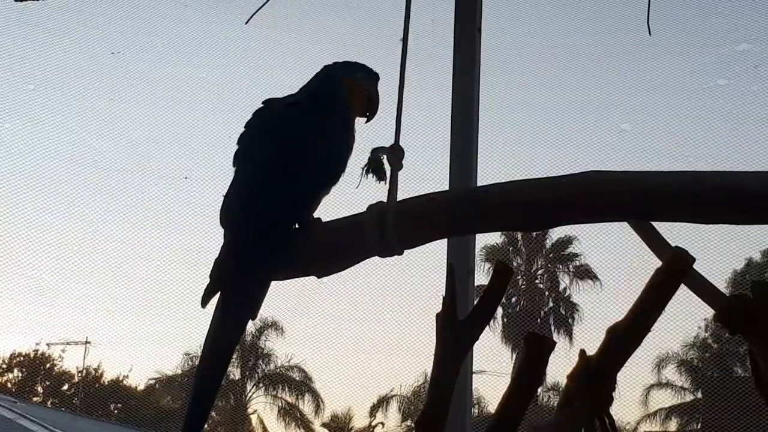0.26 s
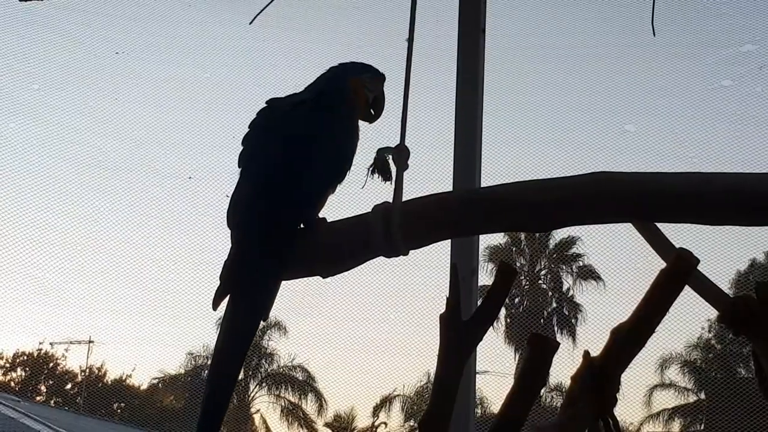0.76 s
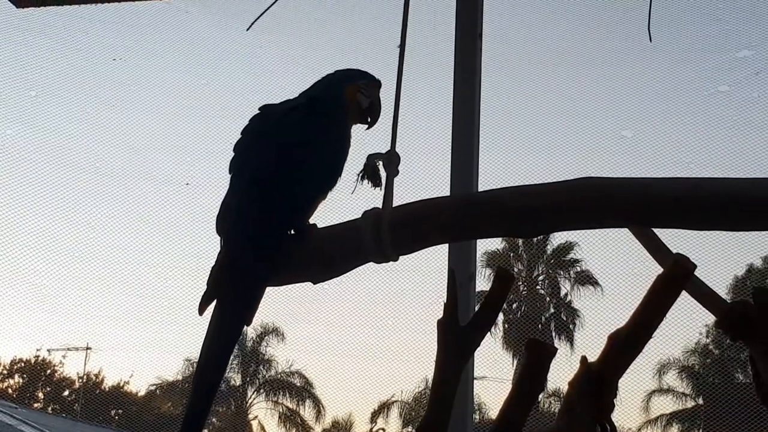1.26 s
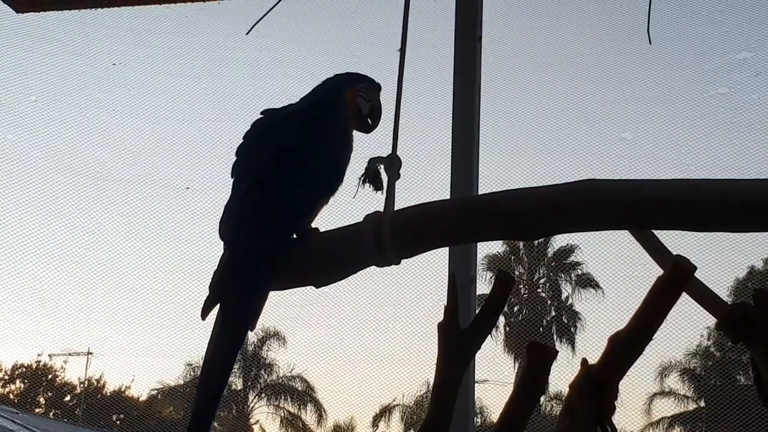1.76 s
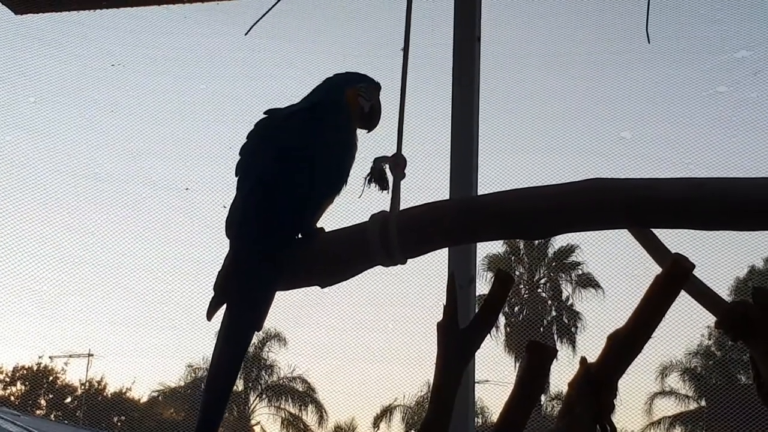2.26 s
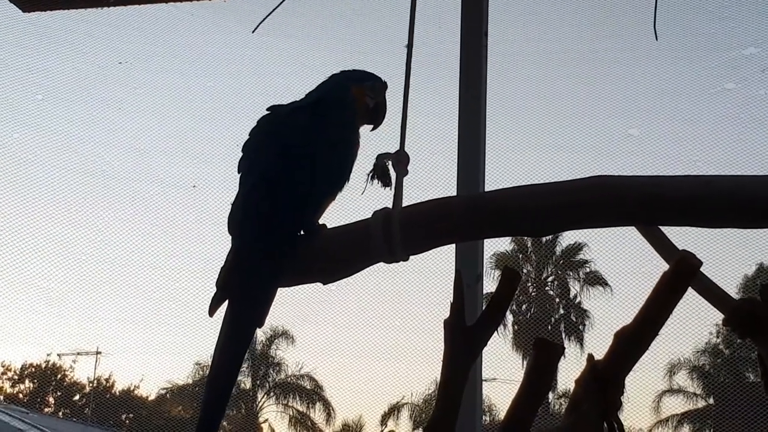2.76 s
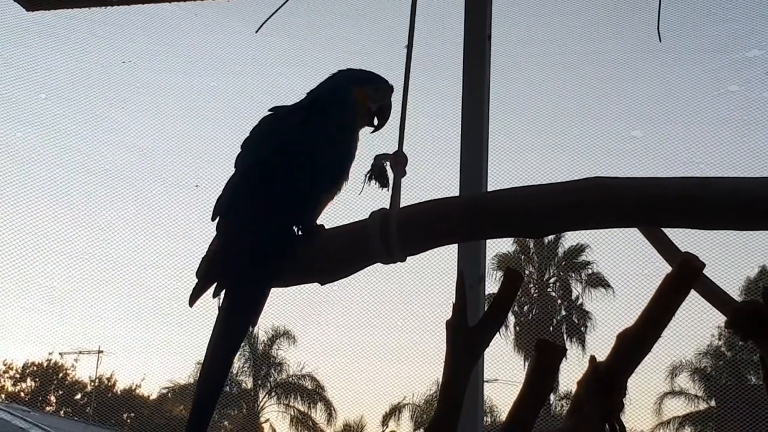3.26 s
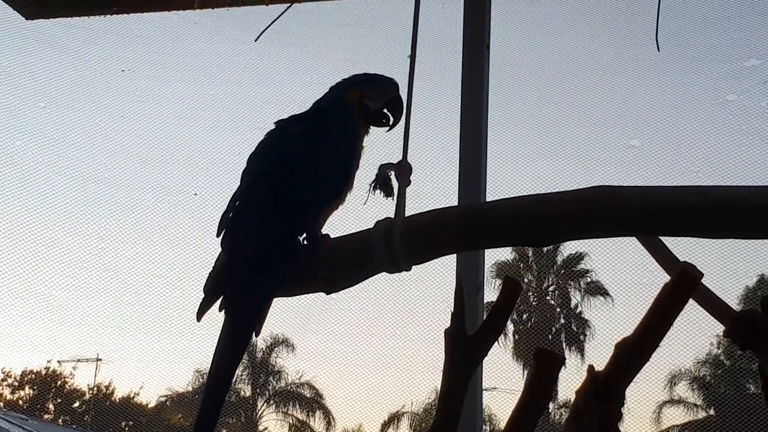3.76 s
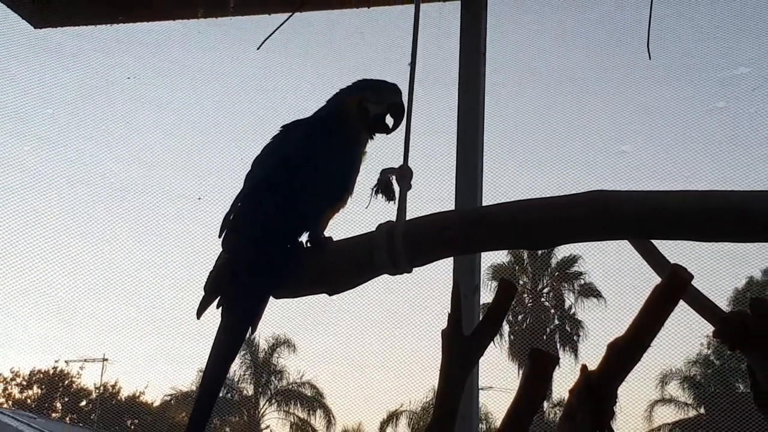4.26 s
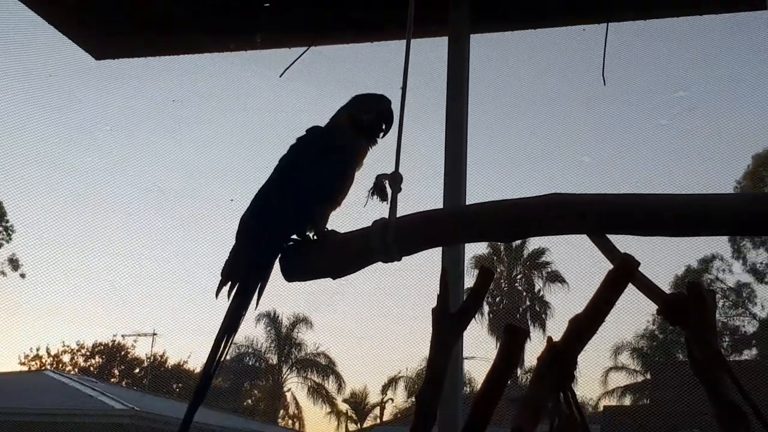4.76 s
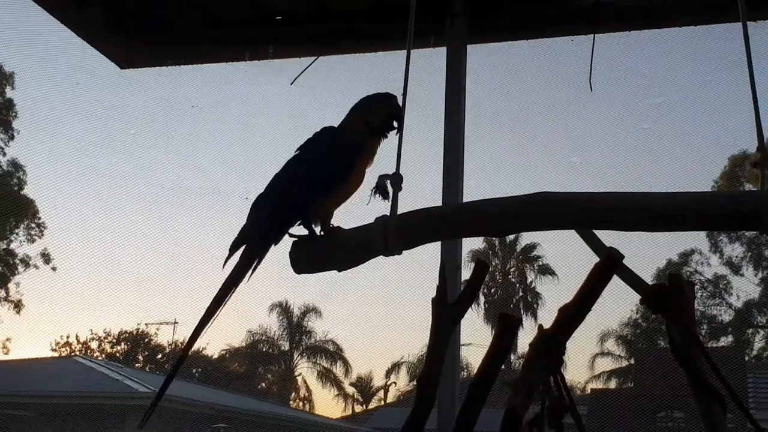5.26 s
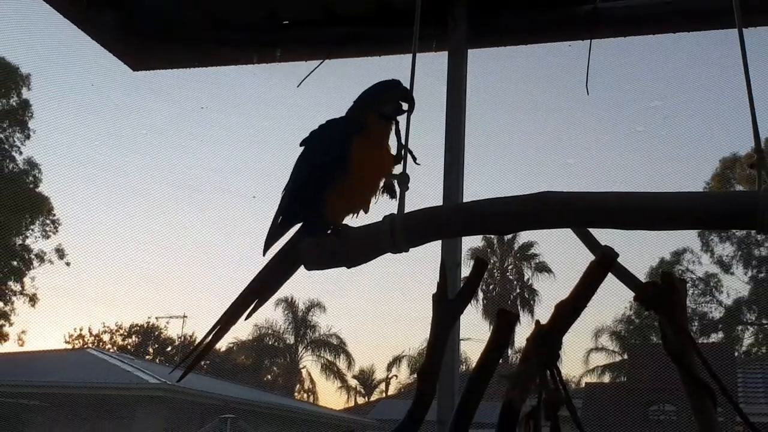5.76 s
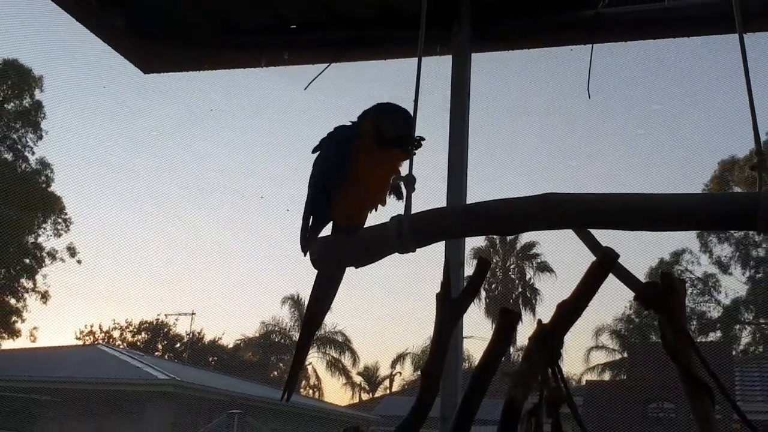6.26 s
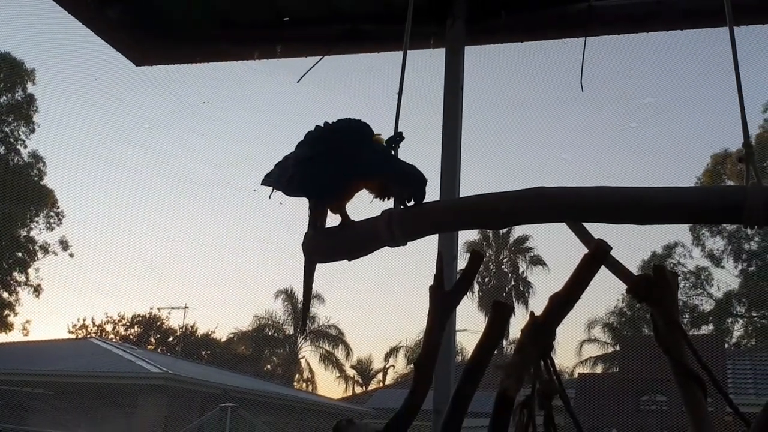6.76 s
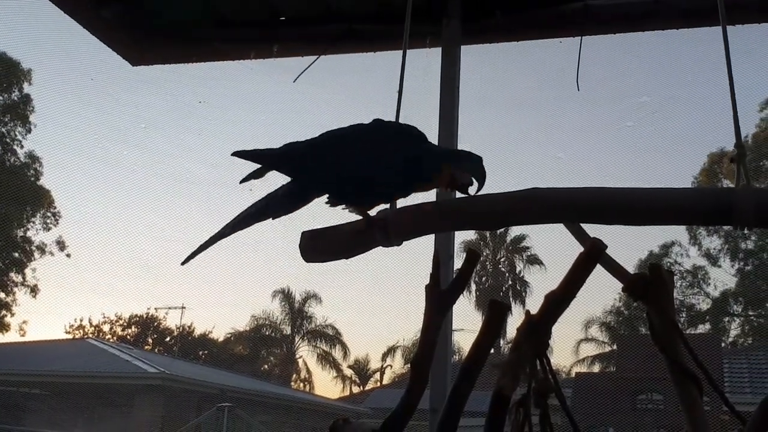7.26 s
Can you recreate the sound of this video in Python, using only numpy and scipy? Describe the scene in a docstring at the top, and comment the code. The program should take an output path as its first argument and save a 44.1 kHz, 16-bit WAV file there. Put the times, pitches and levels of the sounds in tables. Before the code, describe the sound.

Quiet outdoor aviary in stereo: low, steady town rumble and the hazy blur of a far flock. From 0 to 0.4 s distant parrots chirp busily with a faint rasp, and another rasp comes at 0.43 s. At about 0.6 s a close parrot gives a loud squawk, opening with a pop, sagging in pitch and breaking hoarse by 0.9 s; a thin two-voiced whistle overlaps it from 0.76 to 1.03 s. Sparse far chirps, twitter and short rasps continue from 1 to 4 s. At 4.2 s a near whistle climbs for half a second, meeting two harsh, loud squawks at 4.5 and 4.7 s, which bounce off roof, walls and beams and die quickly. Distant rasps and chirps return around 5.2-5.4 s. A small sharp claw click falls at 5.8 s, then soft feathery shuffles on the perch at 6.6-7.1 s, with faint twitter to the end at 7.5 s.

```python
"""Parrots in an outdoor aviary in the early morning, heard by two microphones.
Distant birds chirp and rasp from the start, over a low town rumble and the blur of a far flock.
A near parrot gives a falling squawk with a two-voiced whistle; later another whistle leads into two
harsh squawks. Roof, walls and close beams throw these back. Then a macaw shuffles and clicks on its perch.
Voices are summed harmonics and sines; rasps, shuffles and background are shaped noise."""
import sys
import numpy as np
from scipy import signal
from scipy.fft import rfft, irfft
from scipy.io import wavfile
from scipy.ndimage import uniform_filter1d

SR = 44100
rng = np.random.default_rng(int(sys.argv[2]) if len(sys.argv) > 2 else 0)


def store_pcm(level_fs):
    """Save levels as 16-bit WAV."""
    pcm = np.round(np.clip(level_fs, -1, 1) * 32767).astype(np.int16)
    wavfile.write(sys.argv[1], SR, np.atleast_2d(pcm).T)


N = 331632
TIME = np.arange(N) / SR  # seconds
EDGE_HZ = 15750  # upper limit of the voices' harmonics and of the recorder

# colour of the far flock, also used for the air in the whistles: hz, level_db
FLOCK_SPECTRUM = [(700, -15), (1400, 0.5), (2500, 0), (4200, -1), (6000, -7), (7600, -10), (8600, -24.5),
                  (10500, -20.5), (15500, -24.5)]
# bouts of the far flock: middle_s, half_length_s, note_count, note_level_db, blur_level_db (before the mix)
FLOCK_BOUTS = [(.08, .17, 15, -50, -50.5), (1.118, .17, 4, -64, -57), (1.876, 0.15, 6, -63, -61),
               (2.581, 0.32, 24, -61, -59.5), (3.599, 0.27, 16, -63, -65), (6.296, .14, 9, -62, -55.5),
               (6.85, 0.24, 7, -62.5, -54), (7.35, 0.13, 5, -63.5, -59)]


def falling_squawk():
    """A pop and a nearly clean note that sags, then breaks: its pitch collapses and the membranes turn rough."""
    # strength of the voice, before its gain: time_s, effort_db
    effort_curve = [(0.59, -13.5), (0.606, -18), (0.682, -19), (0.688, -21.5), (0.754, -16.5), (0.772, -31),
                    (0.786, -25), (0.842, -26.5), (0.88, -40)]
    # throat and beak: hz, level_db
    throat_spectrum = [(200, -41.5), (390, -21.5), (520, -7.5), (820, 1), (1200, -10), (1720, 1.5),
                       (2200, -12.5), (3100, -10.5), (4200, -16.5), (5000, -24.5), (7500, -37),
                       (9000, -48.5), (10500, -48), (15500, -45.5)]
    # the air pulse as the syrinx snaps open: hz, level_db
    pop_spectrum = [(60, -8.5), (300, -0.5), (1500, -4), (4000, -13), (9000, -27.5), (15500, -31.5)]
    start_s, break_s, collapse_s, tear_s = .5853, .686, .068, .075
    start_hz, sag_hz_per_s, collapsed_hz = 862.4, 1020, 425
    clean_rough, broken_rough = .08, .75  # 0-1
    clean_bright_db, broken_bright_db = 1.5, -2  # tilt in dB per octave
    gain_db, pop_db = -1.5, -15.5

    s = start_s + span(effort_curve[-1][0] - start_s)
    since_break = np.maximum(s - break_s, 0)
    held_hz = start_hz - sag_hz_per_s * (np.minimum(s, break_s) - start_s)
    hz = collapsed_hz + (held_hz - collapsed_hz) * np.exp(-since_break / collapse_s)
    torn = 1 - np.exp(-since_break / tear_s)
    rough = clean_rough + (broken_rough - clean_rough) * torn
    bright_db = clean_bright_db + (broken_bright_db - clean_bright_db) * torn
    voice = squawk(gain_db + follow(effort_curve, s), hz, rough, bright_db,
                   lambda x: colour(x, throat_spectrum),
                   jitter=0.0606, jitter_hz=91.7, tear_db=12, breath=0.43, doubling=0.48, thin_db=22)
    pop = colour(signal.unit_impulse(512), pop_spectrum)
    out = np.zeros(N)
    add(out, start_s, voice)
    add(out, start_s, amp(pop_db) * pop / abs(pop).max())
    return out


def harsh_squawks():
    """Rough voices that swell with a bend in pitch, shudder, and fray and dull as they let go."""
    # the squawks: start_s, swell_s, hold_s, release_s, effort_db, pitch_hz, bend_hz (in the swell),
    # roughness (0-1), shudder_db
    squawk_table = [(4.478, .102, .028, .04, -15, 399.6, 88, .36, 3.5),
                    (4.712, .057, 0.041, .024, -13.5, 396.3, -40, 0.16, 1)]
    # throat resonances: hz, width_hz, level_db
    throat_modes = [(575, 130, -4), (749, 110, 2), (1200, 110, 3), (1570, 140, 1.5), (3134, 170, 0),
                    (3408, 120, 1.5), (4065, 310, -7), (5340, 240, -16.5), (6667, 210, -17),
                    (7570, 280, -24), (10040, 600, -31), (12600, 1300, -38.5), (14300, 600, -39.5)]
    # antiresonances of the beak: hz, width_hz
    beak_notches = [(300, 430), (2050, 240), (2600, 120), (4600, 230), (9200, 1300)]
    attack_s, swell_db, release_db = 0.014, 12, 21.5
    bend_lead_s, bend_width_s = .029, .022  # the pitch bends just before the swell ends
    shudder_hz, slip_per_db = 27.92, .012  # slip: share of the pitch per dB of shudder
    release_rough, start_bright_db, dulling_db = .7, 1.7, 1.75  # brightness in dB per octave

    out = np.zeros(N)
    for s, swell, hold, release, db, pitch_hz, bend_hz, rough, shudder_db in squawk_table:
        t = span(swell + hold + release)
        shut = 1 - ramp(t, attack_s) + ramp(t - swell - hold, release)
        shudder = shudder_db * np.tanh(wander(len(t), shudder_hz))
        effort_db = db - swell_db * (1 - ramp(t, swell)) - release_db * shut + shudder
        bend = bend_hz * np.exp(-((t - swell + bend_lead_s) / bend_width_s) ** 2)
        hz = (pitch_hz + bend) * (1 + slip_per_db * shudder)
        frayed = ramp(t - swell, hold) ** 2
        voice = squawk(effort_db, hz, rough + (release_rough - rough) * frayed,
                       start_bright_db - dulling_db * frayed,
                       lambda x: formants(x, throat_modes, beak_notches),
                       jitter=.075, jitter_hz=79.5, tear_db=8.5, breath=0.16, doubling=2.0, thin_db=-2)
        add(out, s, voice)
    return out


def squawk(effort_db, hz, rough, bright_db, throat, jitter, jitter_hz, tear_db, breath, doubling, thin_db,
           count=41):
    """With roughness the membranes slip in pitch, double their period and let air through."""
    n, rough = len(hz), np.clip(rough, 0, 1)
    turns = np.cumsum(hz * (1 + jitter * rough * wander(n, jitter_hz))) / SR
    tone = np.zeros(n)
    for k in range(1, count):
        harmonic_db = bright_db * np.log2(k)
        harmonic_db += tear_db * np.sqrt(rough) * wander(n, 49)  # every harmonic flutters on its own
        harmonic_db -= thin_db * rough * (k == 1)  # roughness changes the fundamental alone
        wave = np.cos(2 * np.pi * k * turns + k * k / 2)  # the membrane wave smears each pulse
        tone += wave * (k * hz < EDGE_HZ) * amp(harmonic_db)
    every_other_cycle = np.cos(np.pi * turns)
    tone = unit(tone) * (1 + doubling * rough * wander(n, 51) * every_other_cycle)
    # air escapes once a cycle
    puffs = unit((0.56 + np.exp(-(turns % 1) / 0.63)) * rng.standard_normal(n))
    voice = throat(tone + breath * rough * puffs)
    voice /= np.sqrt(uniform_filter1d(voice ** 2, size=600) + 1e-12)  # even level, so effort alone sets it
    return amp(effort_db) * voice


def whistles(waver=0.005, drift=.003, air_db=-27, fade_db=3, fundamental_db=-3):
    """The two sides of the syrinx sing different pitches and make sum and difference tones that come and go."""
    # the whistles: start_s, length_s, first_hz, top_hz, overtone_level_db (before the mix),
    # lower_voice_joins_s (about half grown)
    whistle_table = [(.76, .27, 2397, 2471, -29, 0.0092), (4.205, .505, 2014, 2420, -29.5, .095)]
    # tones of the coupled voices: multiple_of_upper, multiple_of_lower, first_whistle_db, second_whistle_db
    tone_table = [(1, 0, -0.5, 1), (2, 0, -25.5, -11.5), (3, 0, -44, -30.5), (4, 0, -49, -53),
                  (5, 0, -48, -47.5), (0, 1, -19.5, -27), (0, 2, -16, -22.5), (1, 1, -11.5, -14.5),
                  (2, -1, -22.5, -24), (3, -2, -23.5, -32.5), (-1, 2, -57, -35.5), (3, -1, -20, -22.5),
                  (0, 3, -23.5, -46), (1, 2, -27.5, -29), (2, 1, -32, -25)]
    # one curve a whistle for its fundamental, before gains: time_s, level_db
    fundamental_curves = [
        [(0.76, -21), (0.772, -34), (0.824, -22), (0.934, -33), (0.956, -19.5), (0.986, -30), (1.03, -36)],
        [(4.205, -62), (4.215, -50.5), (4.263, -29.5), (4.349, -23), (4.371, -37.5), (4.467, -36.5),
         (4.511, -27.5), (4.627, -40.5), (4.657, -27), (4.71, -37)],
    ]
    climb_s, droop_s, droop_hz = .125, .033, 225  # the upper voice climbs and droops at the end
    gap_hz, gap_at_hz, gap_shrink = 542, 2407, .3  # the lower voice closes in as the pitch rises
    attack_s, release_s, edge_db = .05, .045, 13.5

    out = np.zeros(N)
    for which, (s, length, first_hz, top_hz, db, joins_s) in enumerate(whistle_table):
        t = span(length)
        n = len(t)
        climb = (first_hz - top_hz) * np.exp(-t / climb_s)
        droop = droop_hz * np.exp((t - length) / droop_s)
        upper_hz = (top_hz + climb - droop) * (1 + drift * wander(n, 18))
        lower_hz = upper_hz - gap_hz + gap_shrink * (upper_hz - gap_at_hz)
        # each side wavers on its own
        upper = 2 * np.pi * np.cumsum(upper_hz * (1 + waver * wander(n, 200))) / SR
        lower = 2 * np.pi * np.cumsum(lower_hz * (1 + waver * wander(n, 200))) / SR
        effort_db = db - edge_db * (1 - ramp(t, attack_s) * ramp(length - t, release_s))
        joined = np.clip((t - joins_s) / .03 + 0.48, .25, 1)  # the lower voice never falls below a quarter
        tone = np.zeros(n)
        for k, (a, b, *tone_db) in enumerate(tone_table):
            if k == 0:
                level_db = fundamental_db + follow(fundamental_curves[which], s + t)
            else:
                level_db = effort_db + fade_db * wander(n, 7.2)
            wave = np.sin(round(a) * upper + round(b) * lower)
            tone += amp(tone_db[which] + level_db) * wave * (joined if round(b) else 1)
        air = amp(air_db + effort_db) * unit(colour(rng.standard_normal(n), FLOCK_SPECTRUM))
        add(out, s, (np.sqrt(2) * tone + air) * signal.windows.tukey(n, .03))
    return out


def macaw(grain_db=4):
    """Claws and feathers on the perch: grainy noise shuffles and one sharp, fast-dying claw click."""
    # the shuffles: start_s, length_s, level_db (before fades and mix)
    shuffle_table = [(5.72, 0.08, -80), (6.58, 0.084, -61), (6.671, 0.17, -59.5), (6.936, 0.17, -57)]
    # feathers on wood: hz, level_db
    feather_spectrum = [(500, -31), (2200, 10), (5000, 6.5), (7500, -4), (9000, -6), (14000, -10),
                        (16000, -18)]
    # the claw click: hz, level_db
    claw_spectrum = [(1000, -25), (3000, -11), (6000, 8), (7500, -4), (9000, -16), (15000, -30.5)]
    click_s, click_db, click_t60_s = 5.823, -41.5, 0.021

    out = np.zeros(N)
    for s, length, db in shuffle_table:
        n = int(length * SR)
        grains = rng.standard_normal(n) * amp(grain_db * wander(n, 310))
        add(out, s, amp(db) * unit(colour(grains, feather_spectrum)) * signal.windows.tukey(n, .7))
    t = TIME[:SR // 10]
    click = unit(colour(rng.standard_normal(len(t)), claw_spectrum))
    add(out, click_s, amp(click_db) * click * np.exp(-np.log(1000) * t / click_t60_s))
    return out


def chirps(low_hz=2600, high_hz=5900, glide=0.24, shortest_s=.022, spread_s=.04):
    """Distant parrots: gliding clear notes, and bouts of faint twitter at random times and pitches."""
    # the clear notes: start_s, length_s, level_db (before the mix), strongest_harmonic_hz, glide_octaves,
    # harmonic_number (of the strongest)
    note_table = [(0, 0.048, -51, 3800, -0.44, 1), (.031, 0.039, -38.5, 5750, 0.34, 1),
                  (.1, .07, -47.5, 3960, .13, 1), (.145, 0.066, -41, 6050, -.1, 1),
                  (.181, 0.1, -45.5, 3600, -0.23, 2), (.25, .07, -44.5, 3460, .05, 1),
                  (0.333, .095, -48, 4940, -0.25, 2), (1.064, .025, -45, 4200, .05, 1),
                  (1.21, 0.08, -56.5, 4450, 0.056, 4), (1.525, 0.17, -53, 2760, -0.58, 1),
                  (1.66, 0.076, -54, 1180, .02, 1), (1.787, 0.13, -57, 5500, 0.046, 5),
                  (1.888, 0.057, -51.5, 4320, -.06, 1), (2.14, 0.082, -51.5, 4680, -0.038, 1),
                  (2.255, 0.08, -53.5, 3780, -0.05, 1), (2.47, 0.37, -62, 2553, 0.11, 1),
                  (2.55, 0.26, -57.5, 5020, 0.12, 1), (2.685, 0.11, -56.5, 3650, -0.16, 1),
                  (3.34, 0.059, -57.5, 5450, 0.29, 2), (3.512, 0.17, -59.5, 5360, 0.48, 1),
                  (3.663, .11, -52.5, 4500, .03, 3), (3.815, 0.067, -49, 4680, .07, 3),
                  (4.127, 0.11, -57.5, 4190, .07, 1), (5.198, 0.051, -53, 2620, -0.052, 1),
                  (5.424, 0.157, -56.5, 4460, -.01, 4), (6.237, 0.096, -55.5, 3790, 0.084, 1),
                  (6.234, 0.13, -54.5, 5690, -.04, 1), (6.656, .15, -54, 3950, -0.32, 1),
                  (7.246, .07, -57, 3360, 0.013, 1), (7.29, 0.097, -54.5, 4490, -0.026, 4),
                  (7.338, .082, -55.5, 3160, -.13, 1)]
    out = np.zeros(N)
    for s, length, db, *shape in note_table:
        add(out, s, amp(db) * chirp(length, *shape))
    for middle, half, notes, db, _ in FLOCK_BOUTS:
        for when, size, height, slope in rng.random((round(notes), 4)):
            pitch_hz = low_hz * (high_hz / low_hz) ** height
            note = chirp(shortest_s + spread_s * size, pitch_hz, glide * (2 * slope - 1), 1)
            add(out, middle + half * (2 * when - 1), amp(db) * note)
    return out


def chirp(length, middle_hz, glide, harmonic, waver=.013, flutter_db=4, below_db=-5, above_db=-12):
    """One short arched glide, hoarse and fluttering: a strong harmonic and its neighbours in the throat's band."""
    arch_octaves = .035  # both ends sag by this
    throat_low_hz, throat_high_hz = 2300, 7000
    u = np.linspace(-.5, .5, int(length * SR))
    k = max(round(harmonic), 1)
    hz = middle_hz * 2 ** (glide * u - arch_octaves * (2 * u) ** 2) * (1 + waver * wander(len(u), 130))
    phase = 2 * np.pi * np.cumsum(hz) / SR
    note = np.sin(phase)
    for ratio, db in ((1 - 1 / k, below_db), (1 + 1 / k, above_db)):
        passes = throat_low_hz < ratio * middle_hz < throat_high_hz
        note += amp(db) * np.sin(ratio * phase) * passes
    return unit(note * amp(flutter_db * wander(len(u), 45)) * signal.windows.tukey(len(u), .5))


def rasps(rattle_hz=130, rattle_db=0.5, ring_db=-3):
    """Distant screeches: rattling air through a small throat that rings just above its centre."""
    # the screeches: start_s, length_s, level_db (before ramps and mix), centre_hz
    rasp_table = [(0, 0.26, -49, 3700), (0.426, .17, -41.5, 2680), (1.524, 0.06, -50.5, 2550),
                  (1.645, .11, -44, 2760), (2.258, 0.12, -49.5, 3900), (3.214, 0.095, -58.5, 4100),
                  (5.247, 0.058, -48, 3250), (5.391, 0.054, -45, 3360), (6.171, 0.38, -60, 2570)]
    # the throat's spectrum: octaves_from_centre, level_db
    rasp_spectrum = [(-2.8, -31.5), (-0.065, -6), (-1.4, -6.5), (0.43, -5), (1.1, -19.5), (0.32, -3.5),
                     (1.28, -24), (1.7, -57)]
    attack_s, release_s = 0.0082, .025
    out = np.zeros(N)
    for s, length, db, hz in rasp_table:
        n = int(length * SR)
        t = TIME[:n]
        air = rng.standard_normal(n) * amp(rattle_db * wander(n, rattle_hz))
        voice = colour(air, [(hz * 2 ** octave, gain) for octave, gain in rasp_spectrum])
        voice += formants(voice, [(hz * 1.08, 250, ring_db)], [])
        add(out, s, amp(db) * unit(voice) * ramp(t, attack_s) * ramp(length - t, release_s))
    return out


def background():
    """Town rumble below; above, the blur of the far flock swells with each bout."""
    # town rumble: hz, level_db (per Hz)
    rumble_spectrum = [(15, -35.5), (28, -16.5), (50, -2.5), (85, 1.5), (130, -7.5), (240, -7), (370, -12),
                       (700, -13.5), (1100, -17.5), (1600, -25.5), (2500, -54)]
    # its level, before its gain: time_s, level_db
    rumble_curve = [(0.0, -46), (0.04, -50), (1.3, -52), (1.36, -53.5), (4.59, -53.5), (5.86, -61.5),
                    (5.99, -54.5), (7.52, -55)]
    rumble_gain_db, flock_db = 2, -61  # flock_db: the blur between bouts
    rumble = wash(rumble_spectrum, patchy_db=1.5, pan_db=1.3)
    rumble = rumble * amp(rumble_gain_db + follow(rumble_curve, TIME))
    swell_power = sum(amp(db) ** 2 * np.exp(-((TIME - middle) / half) ** 2)
                      for middle, half, _, _, db in FLOCK_BOUTS)
    blur = wash(FLOCK_SPECTRUM, patchy_db=1.6, pan_db=0.8)
    return rumble + blur * np.sqrt(amp(flock_db) ** 2 + swell_power)


def wash(spectrum, patchy_db, pan_db, size=2048):
    """Far-off noise with drifting patches, alike at both microphones in the bass."""
    # left-right likeness of the far noise: hz, likeness (-1 to 1)
    likeness = [(60, 0.99), (130, 0.93), (290, 0.92), (640, 0.6), (1410, -0.68), (3100, 0.1), (6820, -0.07),
                (15000, -0.34)]
    hz, frames = np.fft.rfftfreq(size, 1 / SR), N // (size // 4) + 5
    a, b, c, d, patches = rng.standard_normal((frames, len(hz), 5)).T
    patches = uniform_filter1d(patches, size=14, axis=0)  # across frequency
    patches = unit(uniform_filter1d(patches, size=7, axis=1))  # across time
    same = np.clip(read(likeness, hz), -1, 1)[:, None]
    left = a + 1j * b
    z = np.array([left, same * left + np.sqrt(1 - same ** 2) * (c + 1j * d)])
    z *= amp(read(spectrum, hz)[:, None] + patchy_db * patches)
    noise = signal.istft(z, nperseg=size, noverlap=size * 3 // 4)[1][:, :N]
    return unit(noise) * amp([[pan_db / 2], [-pan_db / 2]])


def reverb(x, t60s, build_s):
    """Sparse reflections, alike at both microphones in the bass, each band dying at its own speed."""
    # left-right likeness of reflections: hz, likeness (-1 to 1)
    likeness = [(100, 1), (700, 0.87), (1400, 0.2), (2400, 0.55), (3200, -0.64), (5000, 0), (15000, 1)]
    taps = rng.standard_normal((2, SR)) * (rng.random((2, SR)) < 6000 / SR)  # about 6000 a second
    hz, t, z = signal.stft(taps, SR, nperseg=256)
    same = np.clip(read(likeness, hz), -1, 1)[:, None]
    z = np.array([z[0], same * z[0] + np.sqrt(1 - same ** 2) * z[1]])
    decay = amp(-60 * t / read(t60s, hz)[:, None])
    tail = signal.istft(z * decay, SR, nperseg=256)[1][:, :SR]
    tail *= 1 - np.exp(-(TIME[:SR] / build_s) ** 2)
    tail = tail / np.linalg.norm(tail, axis=1, keepdims=True)
    return signal.fftconvolve(x[None], tail, axes=1)[:, :N]


def ears(x, lag_s, pan_db):
    """The direct sound reaches the right microphone lag_s after the left, and pan_db weaker."""
    hz = np.fft.rfftfreq(N, 1 / SR)
    right = irfft(rfft(x) * np.exp(-2j * np.pi * hz * lag_s), N)
    return np.array([x * amp(pan_db / 2), right * amp(-pan_db / 2)])


def formants(x, modes, notches):
    """Ringing resonances, each applied twice, then dark gaps cut by antiresonances."""
    out = np.zeros(len(x))
    for hz, width, db in modes:
        b, a = signal.iirpeak(hz, hz / (2 * width), SR)
        out += amp(db) * signal.lfilter(b, a, signal.lfilter(b, a, x))
    for hz, width in notches:
        out = signal.lfilter(*signal.iirnotch(hz, hz / width, SR), out)
    return out


def colour(x, points, size=1024):
    """Causal (minimum-phase) filter with the given spectrum."""
    log_gain = np.log(amp(read(points, abs(np.fft.fftfreq(size, 1 / SR)))))
    taps = np.fft.ifft(np.exp(np.conj(signal.hilbert(log_gain)))).real
    return signal.fftconvolve(x, taps[:size // 2])[:len(x)]


def wander(n, hz):
    """Smooth chance of rms about 1, up to about hz."""
    f = np.fft.rfftfreq(n + 4096, 1 / SR)
    smooth = rfft(rng.standard_normal(n + 4096)) * np.exp(-.5 * (f / hz) ** 2)
    return unit(irfft(smooth)[:n])


def amp(db):
    """Decibels to gain."""
    return 10 ** (np.asarray(db) / 20)


def unit(x):
    """Scales to rms 1."""
    return x / np.sqrt(np.mean(x ** 2) + 1e-20)


def read(points, hz):
    """Reads a table of values against frequency on a log-frequency axis."""
    f, value = np.transpose(points)
    return np.interp(np.log(hz + 1), np.log(f + 1), value)


def follow(points, t):
    """A level curve at the times t."""
    return np.interp(t, *np.transpose(points))


def span(length):
    """Seconds since the start, sample by sample."""
    return np.arange(0, length, 1 / SR)


def ramp(t, length):
    """Rises from 0 to 1 over the given length."""
    return np.clip(t / length, 0, 1)


def add(mix, s, sound):
    """Mixes a sound in at time s."""
    part = mix[..., max(round(s * SR), 0):][..., :sound.shape[-1]]
    part += sound[..., :part.shape[-1]]


def scene():
    """Near birds ring in the aviary; far ones arrive directly and by way of the yard."""
    # close beams and panels: hz, t60_s
    cage_decay = [(200, 0.028), (1500, 0.09), (5000, 0.075), (14000, 0.0089)]
    # the aviary's reflections: hz, t60_s
    aviary_decay = [(200, .18), (800, 0.24), (1600, 0.26), (3000, 0.33), (7000, 0.15), (14000, .23)]
    # the yard's reflections: hz, t60_s
    yard_decay = [(200, .35), (900, 0.76), (2400, 0.56), (4000, 0.61), (8000, 0.38), (14000, 0.18)]
    # echoes from roof and walls: delay_s, left_gain, right_gain
    echo_table = [(.0052, 0.14, 0.13), (.0095, -0.09, 0.31), (0.021, .25, -.18), (.037, 0.14, 0.096)]
    # mesh walls let the low notes out: hz, reflected_db
    wall_spectrum = [(500, -4), (1400, -2.5), (2800, 1.5), (14000, 3)]

    falling, harsh = falling_squawk(), harsh_squawks()
    small = whistles() + macaw()
    near = falling + harsh + small
    out = ears(falling, lag_s=.00002, pan_db=2.5) + ears(small, lag_s=.00008, pan_db=0.0)
    out += amp(0.5) * ears(harsh, lag_s=-.00005, pan_db=2)

    # beams scatter the treble most
    scattered = colour(harsh, [(600, -15.0), (1500, -10), (3000, -2.5), (14000, -1)])
    out += amp(-0.5) * reverb(scattered, cage_decay, build_s=0.00042)
    out += amp(-5) * reverb(falling + small, cage_decay, build_s=0.00036)
    for delay, left, right in echo_table:
        add(out, delay, np.outer([left, right], near))
    reflected = colour(near, wall_spectrum)
    out += amp(-4.0) * reverb(reflected, aviary_decay, build_s=0.0034)
    out += amp(-29.0) * reverb(reflected, yard_decay, build_s=0.065)

    notes, screeches = chirps(), rasps()
    out += amp(-1.5) * ears(notes, lag_s=0.0002455, pan_db=3.0)
    out += amp(-3.5) * ears(screeches, lag_s=.00004, pan_db=3.0)
    out += amp(-7.0) * reverb(notes + screeches, yard_decay, build_s=0.0055)
    return out + background()


def record(dry):
    """The loudest peaks are rounded off; then the recorder's band limit."""
    rounded = dry / (1 + (dry / .95) ** 8) ** (1 / 8)
    low_pass = signal.firwin(511, EDGE_HZ, window=("kaiser", 9), fs=SR)
    return signal.oaconvolve(rounded, low_pass[None], "same")


dry = scene()
out = record(dry)
store_pcm(out)
```